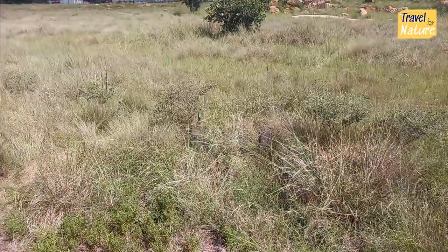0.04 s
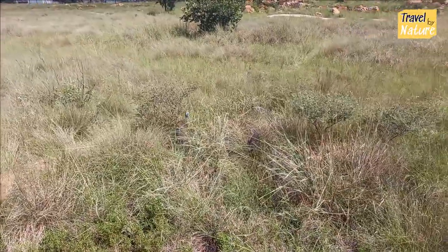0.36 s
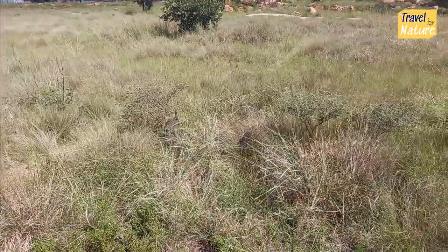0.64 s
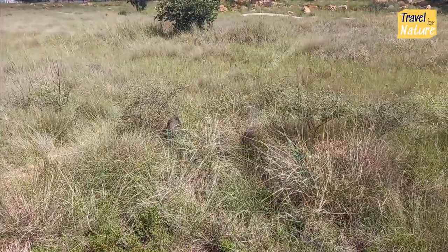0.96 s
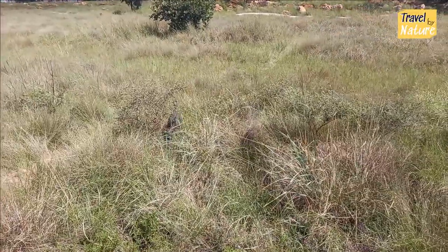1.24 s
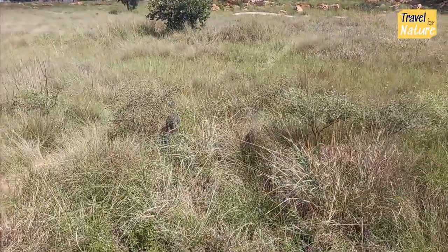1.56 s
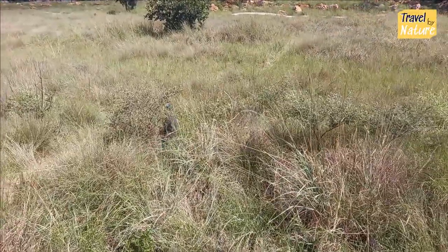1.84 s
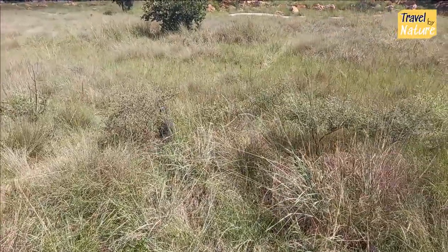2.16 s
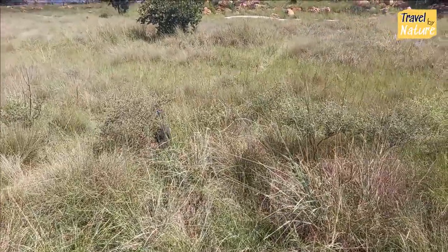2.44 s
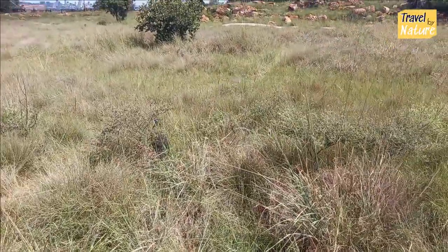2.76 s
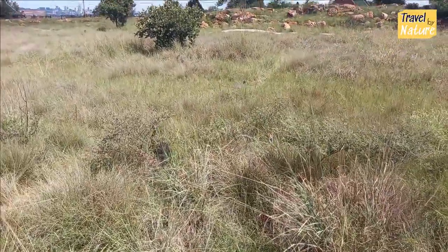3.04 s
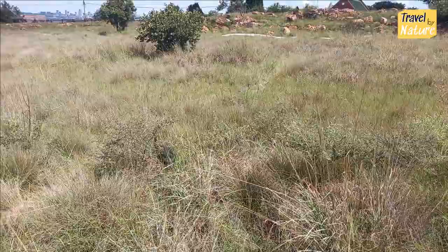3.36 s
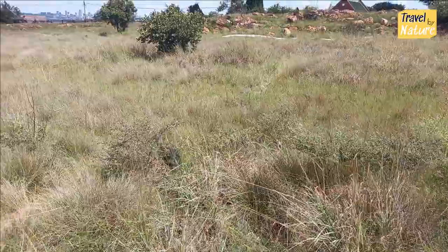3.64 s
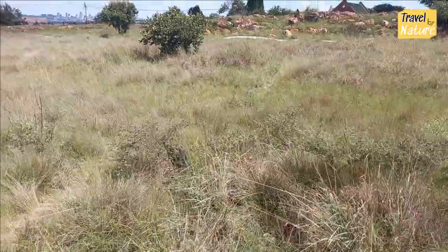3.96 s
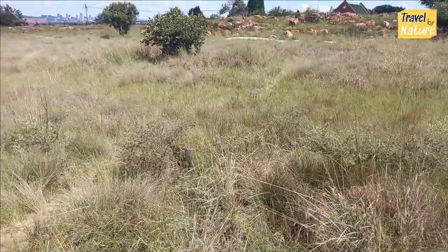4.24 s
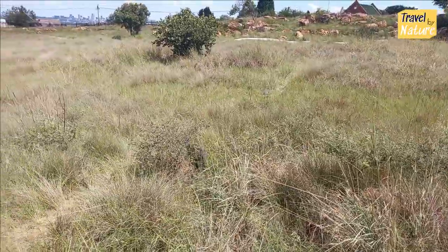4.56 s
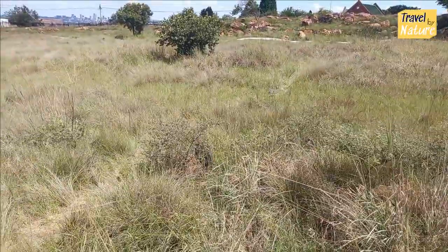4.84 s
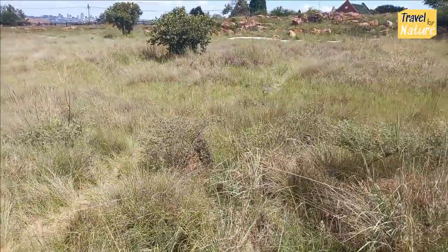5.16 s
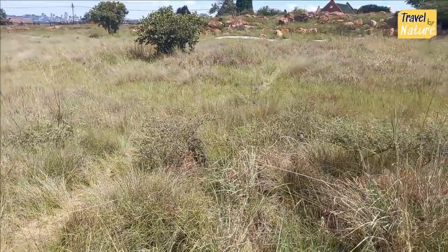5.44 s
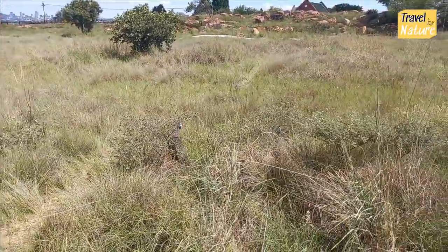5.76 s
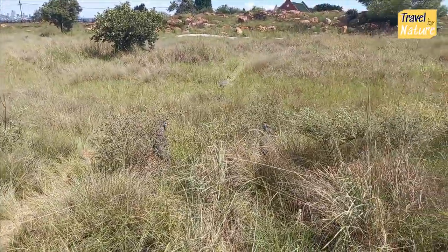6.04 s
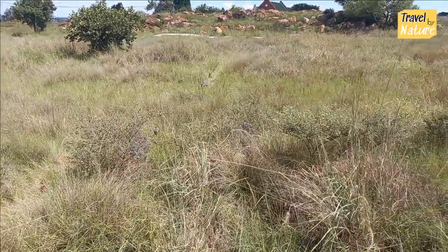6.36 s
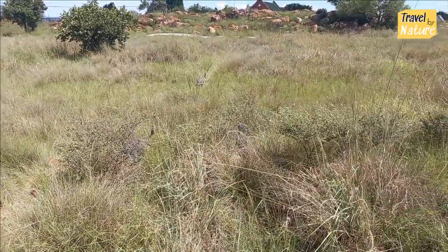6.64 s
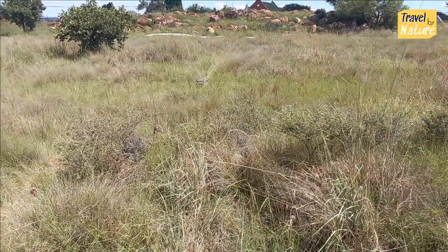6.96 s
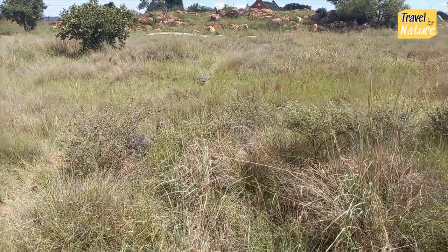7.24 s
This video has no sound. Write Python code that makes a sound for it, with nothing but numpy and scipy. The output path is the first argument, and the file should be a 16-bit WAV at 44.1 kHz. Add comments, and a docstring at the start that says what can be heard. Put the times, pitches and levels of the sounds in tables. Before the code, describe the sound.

A flock of guinea fowl chatters with raspy barks and shrill piping notes, near and far, thinning out over faint wind rumble.

```python
"""Harsh barks and churrs of guinea fowl in dry open grassland, several birds at once, near and far.
Two voices make the calls: a rasp of about 380 membrane pulses a second (barks, churrs, croaks)
and a clear whistle near 1600 Hz (pipes, cries, yelps). The field scatters a thin echo.
Gusts bump the microphone over a low distant rumble; late on, dry stalks tick."""
import sys
import numpy as np
from scipy import signal
from scipy.fft import rfft, irfft, next_fast_len
from scipy.io import wavfile
from scipy.ndimage import uniform_filter1d, map_coordinates

SR = 44100
rng = np.random.default_rng(int(sys.argv[2]) if len(sys.argv) > 2 else 0)


def file_out(sig):
    """Save sig as 16-bit WAV at sys.argv[1]."""
    # one column per channel
    cols = np.atleast_2d(sig).T
    # limit, then scale
    lim = np.clip(cols, -1, 1)
    pcm = np.round(lim * 32767).astype(np.int16)
    wavfile.write(sys.argv[1], SR, pcm)


N = 326781
LEAD_S = .03  # a call starts to swell this far ahead of its time

# second bird's pipes: start_s, length_s, level_db
PIPES = [(0.103, 0.083, -22.5), (0.68, 0.078, -23), (1.228, 0.083, -25), (1.558, 0.079, -23),
         (2.166, 0.067, -25), (2.461, 0.069, -25), (3.081, 0.04, -27.5), (4.246, 0.062, -25),
         (4.847, 0.068, -24), (5.162, 0.054, -23), (5.478, 0.03, -29), (5.766, 0.054, -27),
         (6.091, 0.062, -27), (6.377, 0.06, -24.5), (6.669, 0.062, -24.5), (7.239, 0.045, -29)]
# nearest bird's yelps, whistle over bark: start_s, length_s, whistle_db, bark_db, tilt_db_per_octave
YELPS = [(0.474, 0.045, -17.5, -28, -3.5), (0.86, 0.053, -19, -23, -2), (2.36, 0.049, -14, -27.5, -1.5),
         (3.633, .057, -17, -19, -1)]
# throat response for croaks and pipe cracks: freq_hz, gain_db
CROAK_THROAT = [(270, -36), (380, -6), (500, -98), (900, -2), (1200, -12.5), (1370, -6.5), (1800, 8.5),
                (2570, 6), (2980, 5), (3850, 8), (4600, 6.5), (6270, -9), (9000, -20.5), (15000, -32)]


def amp(db):
    """Decibels to gain."""
    return 10 ** (np.asarray(db) / 20)


def unit(x):
    """Scale to rms 1."""
    return x / np.sqrt(np.mean(x ** 2) + 1e-20)


def along(points, hz):
    """Read (freq_hz, value) points on a log axis."""
    freq_hz, values = np.transpose(points)
    return np.interp(np.log(hz + 1), np.log(freq_hz), values)


def wobble(rate_hz, n):
    """Smooth random curve, rate_hz knots a second."""
    knots = rng.standard_normal(int(n * rate_hz / SR) + 4)
    return map_coordinates(knots, [np.arange(n) * rate_hz / SR], mode="nearest")


def filtered(x, response):
    """Apply a frequency response."""
    n = x.shape[-1]
    padded = next_fast_len(n + 4096)
    return irfft(rfft(x, padded) * response(np.fft.rfftfreq(padded, 1 / SR)), padded)[..., :n]


def coloured(x, points):
    """Filter by (freq_hz, gain_db) points; rms 1."""
    return unit(filtered(x, lambda hz: amp(along(points, hz))))


def stereo(mid, side, side_db):
    """Mid and side to left and right."""
    return np.array([mid + amp(side_db) * side, mid - amp(side_db) * side])


def rush(spectrum, side_db):
    """Coloured stereo noise, rms 1."""
    mid, side = coloured(rng.standard_normal((2, N)), spectrum)
    return unit(stereo(mid, side, side_db))


def add(track, start_s, sound):
    """Mix in a sound, cut to the track; start_s may be negative."""
    start = round(start_s * SR)
    sound = sound[max(0, -start):]
    part = track[max(0, start):][:len(sound)]
    part += sound[:len(part)]


def placed(x, left_lead_samples, left_db):
    """Direction as time and level offsets between the channels."""
    sides = np.array([[1], [-1]])
    shifted = filtered(x, lambda hz: np.exp(1j * np.pi * hz * sides * left_lead_samples / SR))
    return amp(sides * left_db / 2) * shifted


def gesture(length_s, attack_s, release_s, fade_db):
    """Call progress u (0-1) and envelope: swell as pressure builds, late fade, release."""
    t = np.arange(SR // 4) / SR - LEAD_S
    u = np.clip(t / length_s, 0, 1)
    swell = (1 + np.tanh(t / attack_s)) / 2
    stop = (1 - np.tanh((t - length_s) / release_s)) / 2
    return u, swell * stop * amp(-fade_db * u ** 2)


def resonate(x, centre_hz, width_hz):
    """Resonance with a moving centre."""
    turn = np.exp(2j * np.pi * np.cumsum(centre_hz) / SR)
    pole = np.exp(-np.pi * width_hz / SR)
    return 2 * np.real(turn * signal.lfilter([1 - pole], [1, -pole], x / turn))


def steady(x):
    """Even air pressure holds a voice's level over a few pulses."""
    power = uniform_filter1d(x ** 2, size=350)
    return x / np.sqrt(np.abs(power) + 1e-12)


def rasp(pulse_hz, throat, jitter, breath, puff_cycles, smear_s):
    """Uneven membrane slaps, each with a puff of turbulence, through the throat."""
    n = len(pulse_hz)
    cycles = np.cumsum(pulse_hz * (1 + jitter * wobble(400, n))) / SR
    slaps = np.diff(np.floor(cycles), prepend=0)
    # low tones lag by up to smear_s
    slaps = filtered(slaps, lambda hz: np.exp(2j * np.pi * smear_s * 4000 * np.exp(-hz / 4000)))
    puffs = np.exp(-(cycles % 1) / puff_cycles) * rng.standard_normal(n)
    puffs = filtered(puffs, lambda hz: hz ** 2 / (hz ** 2 + 1300 ** 2))  # turbulence has little bass
    return coloured(unit(slaps) + breath * unit(puffs), throat)


def bark(length_s, pulse_hz):
    """The beak opens through a bark, so its resonance climbs and grows."""
    # throat response: freq_hz, gain_db
    throat = [(270, -8), (380, -10), (500, -57), (850, -17.5), (1150, -13.5), (1400, -9.5), (1900, 4.5),
              (2650, 1), (3000, -1.5), (5200, -1), (6000, -12.5), (8300, -10), (11000, -19.5), (15500, -26)]
    u, envelope = gesture(length_s, attack_s=.0065, release_s=.0035, fade_db=1)
    contour_hz = pulse_hz * (1 + .027 * np.sin(np.pi * u) - .059 * u)
    voice = rasp(contour_hz, throat, jitter=.025, breath=.9, puff_cycles=.55, smear_s=.002)
    beak_hz = 10.7 * pulse_hz * (1 + .35 * (np.sqrt(u) - .72))  # a tenser throat raises both
    beak = resonate(voice, beak_hz, width_hz=540)
    opening = 1 + 4 * np.sqrt(u)
    return envelope * steady(voice + opening * beak)


def barks():
    """The nearest bird barks, alone or under a yelp."""
    # short hard barks, one of them under a yelp: start_s, length_s, level_db, pulse_hz
    calls = [(.0, 0.036, -18.5, 383.8), (.105, 0.078, -20.5, 357.4), (0.543, 0.07, -19, 338.7),
             (0.864, 0.071, -16.5, 379.5), (1.199, .05, -18, 379), (1.237, 0.063, -18, 341.2),
             (1.468, 0.059, -18, 375.2), (1.763, 0.06, -16.5, 381), (2.054, .052, -15.5, 378.3),
             (2.762, .052, -14.5, 386.3), (3.161, 0.053, -15.5, 379), (6.898, 0.039, -17, 385.2)]
    track = np.zeros(N)
    for start_s, length_s, level_db, pulse_hz in calls:
        add(track, start_s - LEAD_S, amp(level_db) * bark(length_s, pulse_hz))
    for start_s, length_s, _, bark_db, _ in YELPS:  # the bark leads and outlasts the whistle
        add(track, start_s - .0062 - LEAD_S, amp(bark_db) * bark(length_s + .019, pulse_hz=393.6))
    return track


def churrs():
    """Pulse rate, beak and throat resonances sink; the churr dulls and breaks up as air runs out."""
    # churrs: start_s, length_s, level_db
    calls = [(.0, 0.087, -20), (0.297, .115, -21.5), (0.397, 0.079, -24.5), (0.656, 0.11, -22.5),
             (0.941, 0.12, -21.5), (1.237, 0.14, -24), (1.55, .12, -24.5), (1.87, 0.093, -21),
             (2.197, 0.12, -23), (2.502, .105, -23.5), (3.089, .098, -29), (3.359, 0.14, -28),
             (3.935, 0.089, -25), (4.54, 0.074, -26), (5.486, 0.07, -28), (7.244, 0.086, -36)]
    # throat response: freq_hz, gain_db
    throat = [(270, -32), (380, -5), (500, -10.5), (800, -27), (1130, -7), (1380, -7.5), (1850, 4.5),
              (2950, -5), (4900, 0), (6100, -6.5), (7800, -14.5), (9800, -18.5), (11500, -20.5),
              (15500, -30)]
    track = np.zeros(N)
    for start_s, length_s, level_db in calls:
        u, envelope = gesture(length_s, attack_s=.0072, release_s=.014, fade_db=9)
        pulse_hz = 394 * (1 - .2 * u ** 3)
        voice = rasp(pulse_hz, throat, jitter=.018, breath=.6, puff_cycles=.5, smear_s=.002)
        sink = 1.06 - .32 * u ** 2.2 + .02 * wobble(70, len(u))
        beak_hz = (3905 + 4670 * length_s) * sink
        beak = resonate(voice, beak_hz, width_hz=300)
        beak += .65 * resonate(voice, 2.05 * beak_hz, width_hz=800)
        # low throat resonance, takes over late
        hollow = amp(9.5) * u ** 2 * resonate(voice, .41 * beak_hz, width_hz=290)
        dull = filtered(voice, lambda hz: 1 / (1 + (hz / 4500) ** 2))
        opening = 1.5 + 11 * np.exp(-((u - .3) / .35) ** 2)
        ragged = amp(2.5 * u * wobble(143.7, len(u)))
        churr = steady((1 - u) * voice + u * dull + opening * beak + hollow)
        add(track, start_s - LEAD_S, amp(level_db + 1) * envelope * ragged * churr)
    return track


def field_echo(x, early_db, early_s, bush_db, bush_s, side_db):
    """Grass scatters a dense early echo and a thin tail; distant bushes return a soft one."""
    # echo colour: freq_hz, gain_db
    scatter = [(300, 5.5), (1600, 2.5), (4500, -5), (7000, 1.5), (15000, -5.5)]
    # echo decay: freq_hz, t60_s
    decay = [(300, 0.24), (1600, 0.84), (4500, 0.76), (8000, 0.34), (15000, 0.74)]
    hz, t, noise = signal.stft(rng.standard_normal((2, SR)), SR, nperseg=256)
    early = amp(early_db) * np.exp(-t / early_s)
    bushes = amp(bush_db) * np.exp(-((t - bush_s) / .022) ** 2)
    fade = amp(along(scatter, hz)[:, None] - 60 * t / along(decay, hz)[:, None])
    mid, side = signal.istft(noise * fade * (1 + early + bushes), SR, nperseg=256)[1]
    tail = stereo(mid, side, side_db)
    return signal.fftconvolve(x[None], tail / np.linalg.norm(tail[0]), axes=1)[:, :N]


def air():
    """Distant rumble and steady air over the field."""
    # air spectrum: freq_hz, gain_db
    spectrum = [(20, -2.5), (45, 1), (100, -11), (180, -5.5), (270, -16.5), (450, -27), (700, -30.5),
                (1500, -21), (4000, -21), (7000, -33.5), (15000, -42)]
    return amp(-46.5 + .42 * wobble(6.8, N)) * rush(spectrum, side_db=-3.5)


def pipe_cracks():
    """Each pipe starts with a scrape and cracks into a brief rasp as pressure drops."""
    track = np.zeros(N)
    u, crack = gesture(.036, attack_s=.015, release_s=.0052, fade_db=6)
    _, scrape = gesture(.021, attack_s=.019, release_s=.005, fade_db=1)
    pulse_hz = 385 * (1 - .12 * u)
    for start_s, length_s, level_db in PIPES:
        voice = rasp(pulse_hz, CROAK_THROAT, jitter=.05, breath=.7, puff_cycles=.4, smear_s=.003)
        add(track, start_s + length_s - .011 - LEAD_S, amp(level_db - 8) * crack * voice)
        add(track, start_s - .003 - LEAD_S, amp(level_db - 10) * scrape * voice[::-1])
    return track


def whistles(calls, throat, glide, arch, fade_db, half_db, jitter, lowest_half_db=0):
    """Clear harmonic notes; uneven alternate cycles add weak lines halfway between harmonics."""
    track = np.zeros(N)
    ratios = np.arange(2, 21)[:, None] / 2
    for start_s, length_s, level_db, pitch_hz, tilt_db_per_octave in calls:
        u, envelope = gesture(length_s, attack_s=.0053, release_s=.0013, fade_db=fade_db)
        n, centred = len(u), u - .5
        unrest = jitter * (1 + 5 * (2 * centred) ** 4) * wobble(909, n)  # greatest at the ends
        drift = .0011 * wobble(95, n)
        contour_hz = pitch_hz * (1 + glide * centred - arch * centred ** 2 + unrest + drift)
        partial_db = along(throat, ratios * pitch_hz) + tilt_db_per_octave * np.log2(ratios)
        partial_db += .55 * rng.standard_normal(ratios.shape)
        partial_db[1] += lowest_half_db
        phase = 2 * np.pi * np.cumsum(contour_hz) / SR
        partials = amp(partial_db) * envelope ** (ratios / 8) * np.sin(ratios * phase)  # softer is duller
        halves = partials[1::2].sum(0) * amp(half_db + 8.6 * wobble(111, n))
        harmonic_rms = np.sqrt(np.sum(amp(partial_db[::2]) ** 2) / 2)
        note = (partials[::2].sum(0) + halves) / harmonic_rms
        flutter = amp(.55 * wobble(189, n))
        add(track, start_s - LEAD_S, amp(level_db) * envelope * note * flutter)
    return track


def pipes():
    """Second bird: soft falling whistles, higher and brighter with effort."""
    # throat response: freq_hz, gain_db
    throat = [(1600, 1), (3200, -0.5), (4800, -2), (6400, -10), (8000, -12.5), (9600, -19), (11200, -27.5),
              (15000, -38)]
    calls = []
    for start_s, length_s, level_db in PIPES:
        effort_db = level_db + 25
        pitch_hz, tilt_db_per_octave = 1599.4 + 2 * effort_db, 2 + .5 * effort_db
        calls.append((start_s, length_s, level_db, pitch_hz, tilt_db_per_octave))
    return amp(.7) * whistles(calls, throat, glide=-.025, arch=.065, fade_db=3, half_db=-29, jitter=.003)


def cries():
    """Third bird: arched whistles that grow brighter over its first few calls."""
    # cries: start_s, length_s, level_db, pitch_hz
    notes = [(0.132, 0.076, -23, 1536), (.515, 0.039, -21.5, 1549), (0.854, 0.083, -22, 1543),
             (1.162, 0.067, -18.5, 1543), (1.494, 0.065, -18.5, 1540), (1.849, .065, -19, 1529),
             (2.209, 0.064, -18, 1527), (2.538, 0.067, -18, 1538)]
    # throat response: freq_hz, gain_db
    throat = [(1530, 0), (3070, 6.5), (4600, 1), (6150, -7), (7700, -7.5), (9200, -9.5), (12300, -12),
              (15400, -23)]
    # brightness: time_s, tilt_db_per_octave
    tilt = [(.9, -3.5), (1.12, 1.7)]
    calls = [(start_s, *rest, np.interp(start_s, *np.transpose(tilt))) for start_s, *rest in notes]
    return whistles(calls, throat, glide=.0026, arch=.0603, fade_db=2, half_db=-23, jitter=.0042)


def gusts():
    """Two gusty spells bump the microphone, each dying away on both sides."""
    # wind strength, one curve per spell: time_s, level_db
    spells = [
        [(0.36, -67), (0.486, -31.5), (0.688, -72), (0.712, -32.5), (0.888, -29.5), (0.97, -45), (0.998, -43.5),
         (1.808, -34.5), (1.818, -30), (2.1, -49.5)],
        [(2.7, -56), (2.768, -50), (2.782, -36), (3.014, -28.5), (3.054, -22.5), (3.108, -30), (3.136, -17.5),
         (3.322, -49), (3.358, -29.5), (3.45, -59)],
    ]
    # buffet spectrum: freq_hz, gain_db
    spectrum = [(13, -42), (22, -23), (66, -6.5), (87, -2), (183, -25.5), (336, -31.5), (375, -31.5),
                (449, -59), (600, -49.5), (780, -82), (1320, -120)]
    push, t = np.zeros(N), np.arange(N) / SR
    for spell in spells:
        time_s, level_db = np.transpose(spell)
        outside_s = t - np.clip(t, time_s[0], time_s[-1])
        push += amp(np.interp(t, time_s, level_db)) * np.exp(-(outside_s / .069) ** 2)
    return push * rush(spectrum, side_db=-18)


def yelps(pitch_hz=1615):
    """Nearest bird: loud cracked whistles, all rising through one pitch."""
    # throat response: freq_hz, gain_db
    throat = [(1600, -8), (3250, 1), (4850, -0.5), (6500, -8), (8100, -15.5), (9700, -15), (11300, -18.5),
              (15000, -26)]
    calls = [(start_s, length_s, db, pitch_hz, tilt) for start_s, length_s, db, _, tilt in YELPS]
    return whistles(calls, throat, glide=.0354, arch=.0038, fade_db=-.5, half_db=-15.5, jitter=.0032,
                    lowest_half_db=7.5)


def croaks():
    """Rasps dulled and blurred by distance."""
    # far croaks: start_s, length_s
    calls = [(2.021, 0.059), (2.985, 0.13), (4.195, .08), (4.441, .13), (4.676, .099), (4.92, 0.067),
             (5.461, 0.093), (5.704, 0.13), (5.948, 0.1), (6.224, 0.098), (6.539, 0.088), (6.824, 0.072),
             (7.22, 0.074)]
    track = np.zeros(N)
    for start_s, length_s in calls:
        u, envelope = gesture(length_s, attack_s=.0023, release_s=.0043, fade_db=5.5)
        pulse_hz = 384 * (1 - .16 * u ** 2)
        voice = rasp(pulse_hz, CROAK_THROAT, jitter=.02, breath=.7, puff_cycles=.6, smear_s=.0046)
        add(track, start_s - LEAD_S, amp(-36.5) * envelope * voice)
    return track


def stalks(t60_s=.07):
    """Dry stalks tick close by: fast-decaying noise bursts."""
    # ticks: start_s, level_db
    ticks = [(6.028, -42), (6.215, -35.5), (6.445, -54), (6.824, -39.5)]
    track, t = np.zeros(N), np.arange(SR // 10) / SR
    for start_s, level_db in ticks:
        noise = coloured(rng.standard_normal(len(t)), [(200, -6), (900, 0), (3000, -8), (14000, -20)])
        add(track, start_s, amp(level_db - 3 - 60 * t / t60_s) * noise)
    return track


def scene():
    """Birds placed in the grass, with stalks, echo and wind."""
    # echo sends: nearest_db, second_db, third_db, churr_db, far_db
    sends_db = -10.5, -8, -13.5, -7, 0.5
    nearest = barks() + yelps()
    second = pipe_cracks() + pipes()
    third, churr, far = cries(), churrs(), croaks()
    direct = (placed(nearest, left_lead_samples=.91, left_db=-1.2)
              + placed(second, left_lead_samples=.73, left_db=.3)
              + placed(third, left_lead_samples=.71, left_db=-.3)
              + placed(churr, left_lead_samples=1, left_db=0)
              + far + stalks())
    scattered = sum(amp(db) * voice for db, voice in zip(sends_db, (nearest, second, third, churr, far)))
    echo = field_echo(scattered, early_db=8, early_s=.039, bush_db=-7.5, bush_s=.12, side_db=-3.5)
    return direct + echo + gusts() + air()


def record(dry):
    """Brick-wall low-pass."""
    return filtered(dry, lambda hz: hz < 15900)


dry = scene()
out = record(dry)
file_out(out)
```